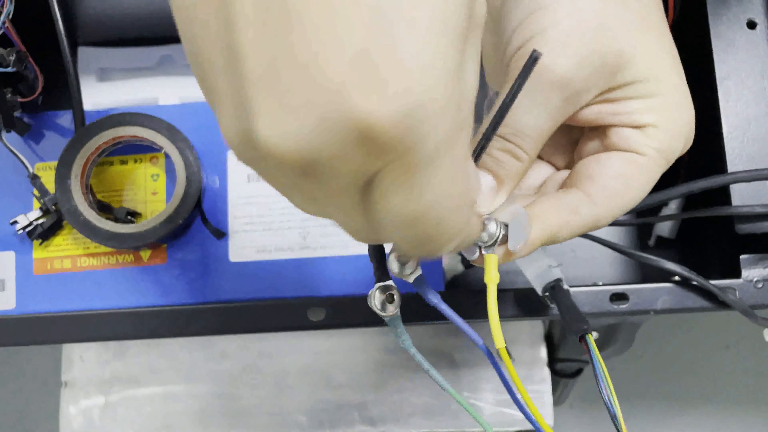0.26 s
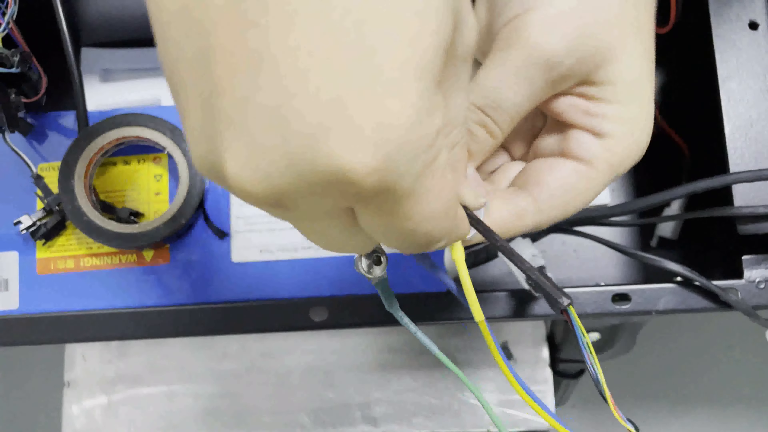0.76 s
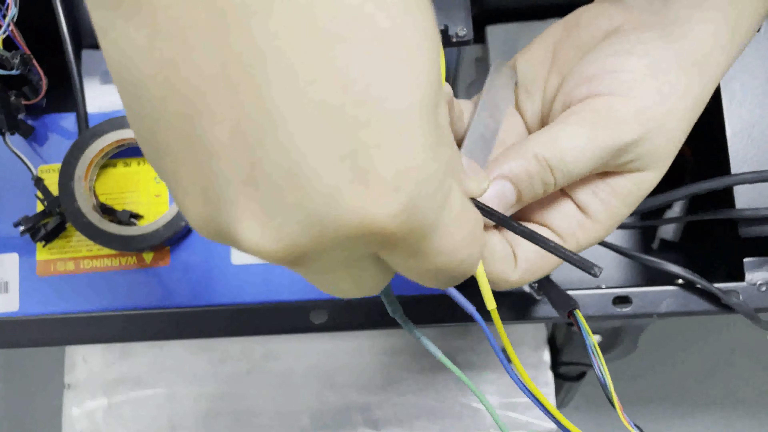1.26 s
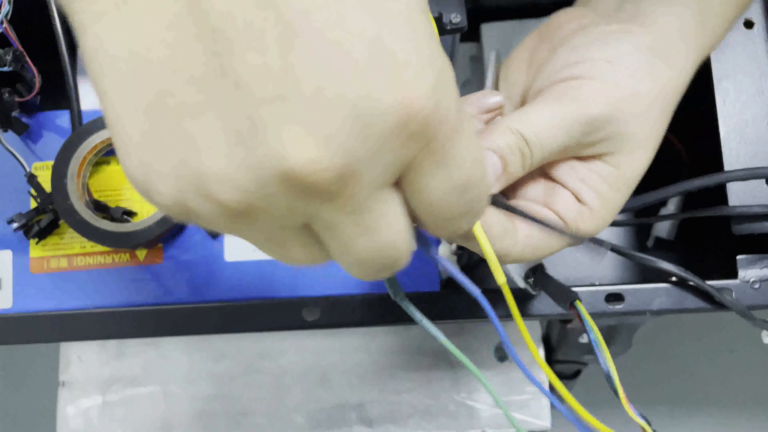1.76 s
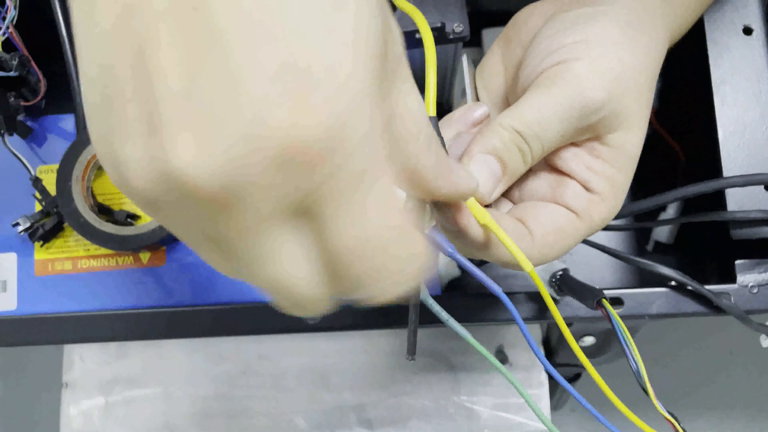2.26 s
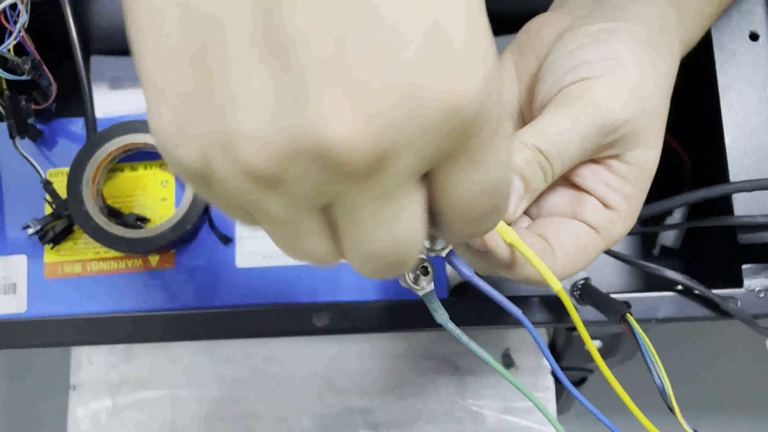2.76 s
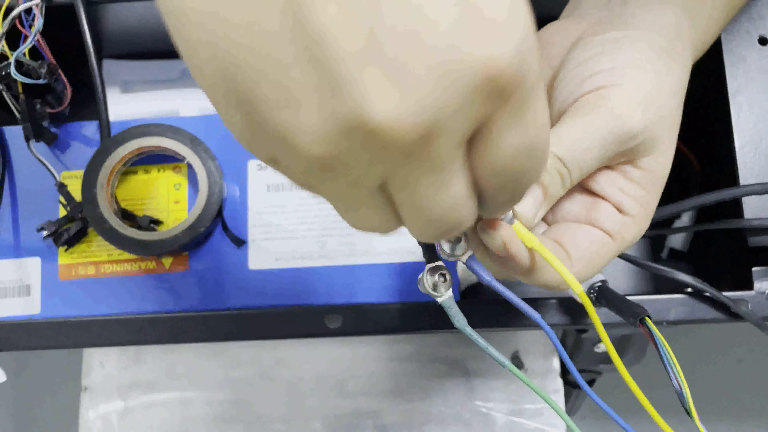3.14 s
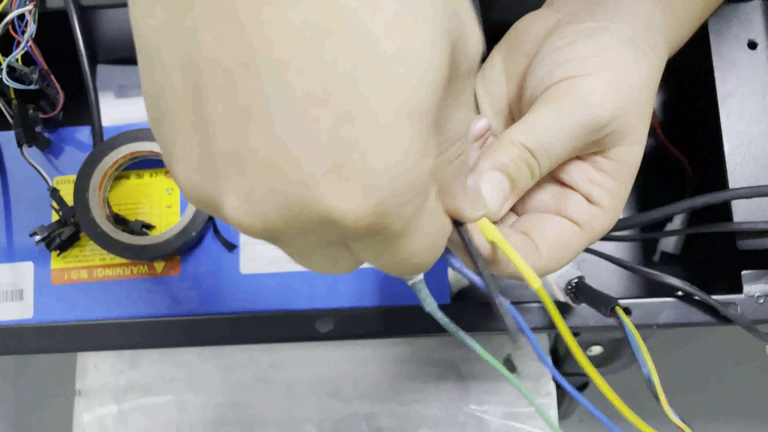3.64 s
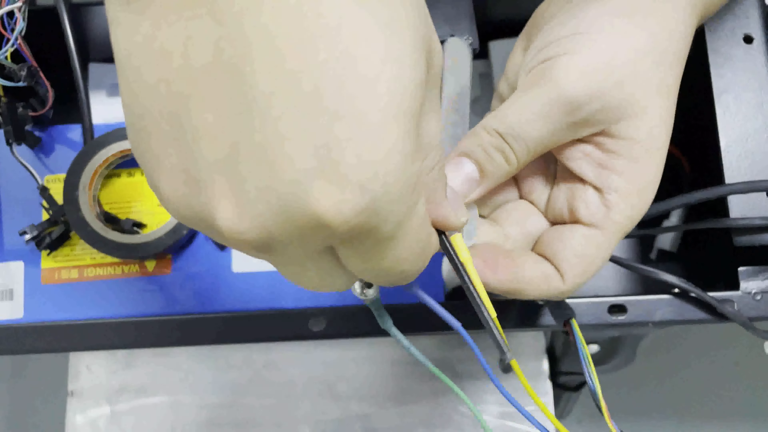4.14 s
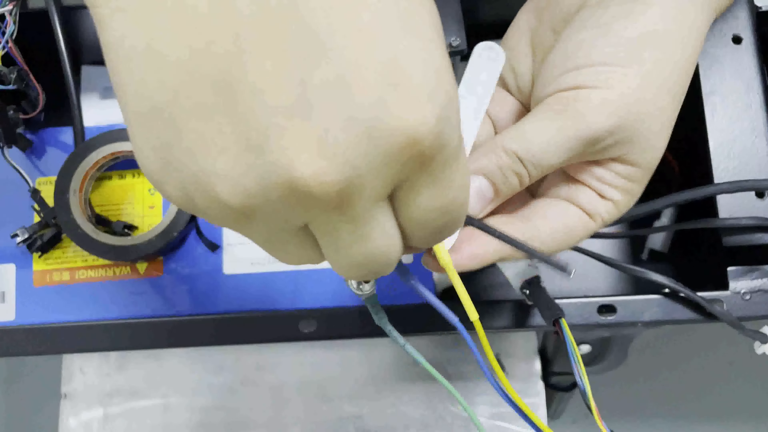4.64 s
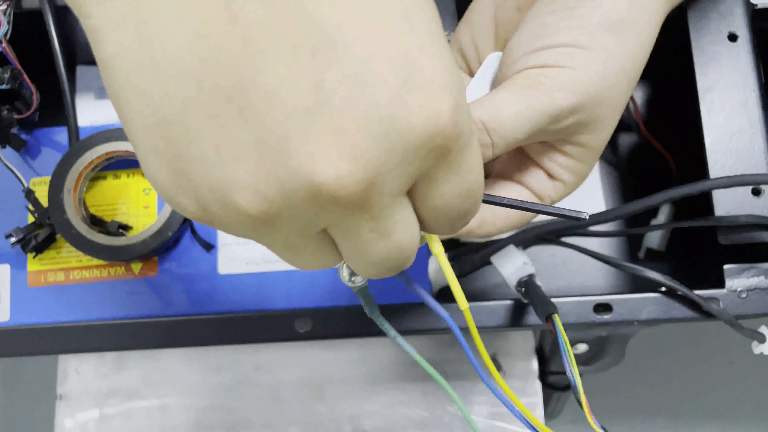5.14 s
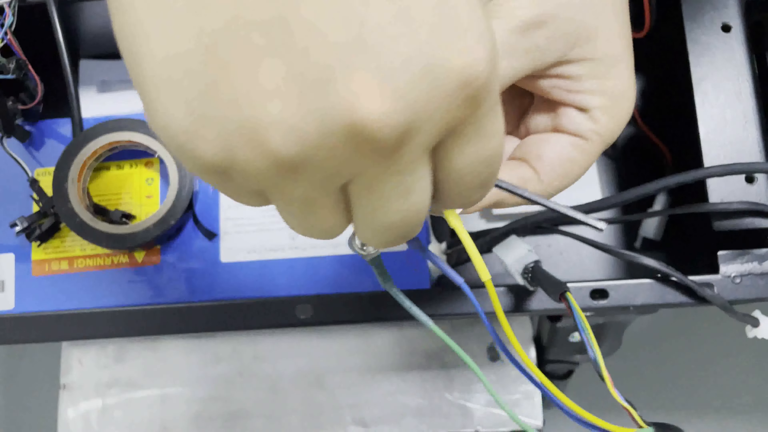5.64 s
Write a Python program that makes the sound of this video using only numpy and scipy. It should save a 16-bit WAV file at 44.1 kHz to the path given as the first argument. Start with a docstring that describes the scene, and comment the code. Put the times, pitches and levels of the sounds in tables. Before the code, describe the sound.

Close handling of wire terminals: soft thumps, skin rubbing insulation, plastic snaps and faint bright metallic ticks above a steady low hum.

```python
"""Assembling ring terminals on a battery pack

Hands fit ring terminals and wire connectors together close to two microphones; fans drone and throb behind.
Metal rings clink and scrape as sums of dying modes; connectors and cables knock the modes of the case.
Fingers rub and squeak on insulation by tiny slips or a wavering tone; plastic snaps and a latch springs home.
Close sounds get a diffuse echo, and metal and plastic also one early reflection."""
import sys
import numpy as np
from scipy import signal
from scipy.fft import rfft, irfft
from scipy.io import wavfile

SR = 44100
rng = np.random.default_rng(int(sys.argv[2]) if len(sys.argv) > 2 else 0)


def generate_wav(sig):
    """Save sig (samples, or channels by samples) to the path in sys.argv[1] as 16-bit PCM at SR."""
    pcm = np.round(np.clip(np.atleast_2d(sig).T, -1, 1) * 32767).astype(np.int16)
    wavfile.write(sys.argv[1], SR, pcm)


N = 260190  # length of the scene in samples
BINS = np.fft.rfftfreq(N, 1 / SR)  # frequencies of the whole scene's spectrum (Hz)


def amp(db):
    """Turns decibels into gain."""
    return 10 ** (np.asarray(db) / 20)


def unit(x):
    """Scales a sound to rms 1."""
    return x / np.sqrt(np.mean(x ** 2) + 1e-24)


def read(points, hz):
    """Reads between the points of a table on a log-frequency axis."""
    f, value = np.transpose(points)
    return np.interp(np.log(hz + 1), np.log(f + 1), value)


def add(mix, s, sound):
    """Mixes a sound in at time s, cutting off what falls outside the scene."""
    start = round(s * SR)
    sound = sound[max(-start, 0):]
    part = mix[max(start, 0):][:len(sound)]
    part += sound[:len(part)]


def drift(rate):
    """Random wander of rms 1, with little movement faster than the rate (Hz)."""
    spectrum = rfft(rng.standard_normal(N))
    lowpass = np.exp(-(BINS / rate) ** 2) * (BINS > 0)
    return unit(irfft(spectrum * lowpass, N))


def ring(modes, t, detune, swell_cycles=1e-6):
    """Modes that swell and die, each slightly detuned at random every time."""
    hz, db, t60 = np.transpose(modes)[:, :, None]
    hz = hz * (1 + detune * rng.standard_normal(hz.shape))
    swell = 1 - np.exp(-hz * t / swell_cycles)
    return (amp(db - 60 * t / t60) * swell * np.sin(2 * np.pi * hz * t)).sum(0)


def weigh(sound, centres_hz, levels_db):
    """Splits a sound into frequency groups and sets each one's level, as an rms over a hundredth of a second."""
    padded = 2 * len(sound)
    hz = np.fft.rfftfreq(padded, 1 / SR)
    # each group peaks at its own centre and fades out towards its neighbours
    shares = [read(list(zip(centres_hz, row)), hz) ** 5 for row in np.eye(len(centres_hz))]
    groups = irfft(rfft(sound, padded) * shares / np.sum(shares, 0))[:, :len(sound)]
    groups /= np.linalg.norm(groups, axis=1, keepdims=True)
    return amp(levels_db) @ groups * np.sqrt(SR / 100)


def slips(length, per_s, spread_db):
    """Tiny stick-slip jerks at random moments, of uneven size and either sign."""
    size = amp(spread_db * np.minimum(rng.exponential(1, length), 4))
    return size * rng.choice([-1, 1], length) * (rng.random(length) < per_s / SR)


# Steady tones of the fans, before the swell: (frequency [Hz], level [dB])
FAN_TONES = [(37.5, -52), (48.9, -44.5), (55.6, -31.5), (61.9, -36), (74, -46.5), (80, -46.5),
             (82.2, -43.5), (267, -59), (297.6, -72.5), (342, -61)]
# Slow swell of the fan tones: (time [s], level [dB])
FAN_SWELL = [(0, 2), (.7, 3), (1.3, -0.5), (1.8, 2.5), (2.3, 2.5), (2.8, 4), (3.3, 0.5), (4.2, 1),
             (5.9, 0.5)]
# Rumble and hiss of moving air, before its own wavering: (frequency [Hz], level [dB per Hz])
AIR_SPECTRUM = [(20, -89), (40, -62.5), (50, -73.5), (72, -47.5), (85, -54.5), (110, -58), (170, -69),
                (270, -66), (400, -75.5), (560, -77), (1300, -85), (2000, -91.5), (6000, -103.5),
                (8500, -119), (12000, -121), (15000, -135)]
# How alike the air sounds left and right: (frequency [Hz], coherence [-1 to 1])
AIR_LIKENESS = [(90, 0.95), (180, 0.82), (400, 0.56), (800, -0.28), (2000, 0.25), (5000, 0.45),
                (9000, -0.48)]


def ventilation(slip_turns=0.12, swell_db=0.7, left_db=1.87):
    """Fans at nearby speeds beat against each other over the rumble and hiss of moving air."""
    t = np.arange(N) / SR
    hum = np.zeros(N)
    for hz, db in FAN_TONES:
        turns = hz * t + rng.random() + slip_turns * drift(3.9)  # the speed wanders a little
        hum += amp(db) * np.sqrt(2) * np.sin(2 * np.pi * turns)
    hum *= amp(np.interp(t, *np.transpose(FAN_SWELL)))
    a, b = rfft(rng.standard_normal((2, N)))
    same = np.clip(read(AIR_LIKENESS, BINS), -1, 1)
    pair = np.array([a, same * a + np.sqrt(1 - same ** 2) * b])
    air = irfft(pair * amp(read(AIR_SPECTRUM, BINS)), N) * np.sqrt(SR / 2)
    air *= amp(swell_db * drift(20.0))
    return (hum + air) * amp([[left_db / 2], [-left_db / 2]])


# Fingers sliding on insulation; the level is before pressure and stutter:
# (start [s], end [s], level [dB], treble lift [dB], chafing pitch [Hz])
RUB_STROKES = [(-.04, 0.134, -41.5, 5.5, 785), (.064, 0.094, -44, -7.5, 800), (0.305, 0.474, -47, 6.5, 430),
               (0.314, .4, -46.5, -6, 2190), (0.419, 0.727, -54, 2.5, 776), (.515, 0.56, -50.5, -4.5, 700),
               (0.928, 1.03, -52, -6.5, 550), (1.335, 1.402, -61, 9, 890), (2.27, 2.463, -51.5, -1, 555),
               (2.561, 2.733, -55.5, 6, 860), (3.245, 3.405, -53, -2, 520), (3.249, 3.337, -53, 6, 1900),
               (4.724, 4.763, -54.5, 15, 1960)]
# Basic colour of skin on insulation: (frequency [Hz], level [dB])
RUB_COLOUR = [(200, -31), (450, 6), (850, 3), (1400, -5.5), (2500, -10.5), (4000, -17), (6500, -24),
              (9000, -33.5), (12000, -30.5), (15000, -40.5)]


def rubs(treble_hz=2000, chafe_db=10, chafe_width=0.05, stutter_db=2.0, lean=0.62, release=0.59):
    """Skin dragging on insulation: dense soft slips under each stroke, chafing at a pitch set by the grip."""
    out = np.zeros(N)
    for start, end, db, treble_db, chafe_hz in RUB_STROKES:
        length = max(round((end - start) * SR), 64)
        hz = np.fft.rfftfreq(length, 1 / SR)
        lift = treble_db * hz ** 2 / (hz ** 2 + treble_hz ** 2)
        chafe = chafe_db / (1 + ((hz / chafe_hz - 1) / chafe_width) ** 2)
        colour = amp(read(RUB_COLOUR, hz) + lift + chafe)
        stroke = irfft(rfft(slips(length, per_s=4500, spread_db=2.6)) * colour, length)
        # presses early, fades slowly
        pressure = np.sin(np.pi * (np.arange(length) / length) ** lean) ** release
        add(out, start, amp(db) * unit(stroke) * pressure)
    return out * amp(stutter_db * drift(53))  # the finger catches and lets go


# A fingertip squeaking on a sleeve: (start [s], end [s])
SQUEAK_SPAN = (2.668, 2.748)
SQUEAK_DB, SQUEAK_HZ = -56, 1660  # peak level before the stutter, and middle pitch


def squeak(waver=0.02, stutter_db=3):
    """Skin sticks and slips evenly for a moment: a thin, unsteady tone."""
    start, end = SQUEAK_SPAN
    progress = np.clip((np.arange(N) / SR - start) / (end - start), 0, 1)
    pressure = 2 * np.sqrt(progress * (1 - progress))
    turns = np.cumsum(SQUEAK_HZ * (1 + waver * drift(150))) / SR
    return amp(SQUEAK_DB + stutter_db * drift(80)) * pressure * np.sin(2 * np.pi * turns)


# Plastic housings and fingernails snapping past each other:
# (time [s], level [dB], pitch [Hz], width [octaves], sent to the echo [dB against the snap])
SNAP_EVENTS = [(.197, -41, 4100, 0.22, -11), (.502, -43.5, 890, 0.9, -9), (2.448, -57.5, 4140, 0.19, -11),
               (2.602, -49.5, 1060, 0.3, -7), (2.667, -47.5, 1090, 1.2, -7), (2.941, -43.5, 810, 0.66, -13),
               (2.959, -47, 4100, 0.26, -12), (3.025, -52, 1800, 0.76, -10), (3.2765, -43, 1050, 1.1, -12),
               (3.279, -47, 645, 0.46, -12), (4.144, -52, 1600, 1.3, -12), (4.706, -48, 3360, 0.53, -12),
               (4.731, -49, 1900, 1.7, -12), (4.734, -57, 2420, 0.37, -8), (4.766, -63, 3100, .45, -10),
               (4.9447, -45.5, 4810, 0.2, -20), (5.739, -51, 1300, 0.34, -6)]
SNAP_MIN_OCTAVES = .2  # plastic is too lossy to ring more narrowly than this


def snaps(contact_s=0.0062, grit=0.21):
    """A sharp release and a rough burst ring one resonance of the plastic; returns direct sound and echo feed."""
    near, far, t = np.zeros(N), np.zeros(N), np.arange(2048) / SR
    for s, db, hz, octaves, echo_db in SNAP_EVENTS:
        order = 4 if octaves < .35 else 2  # the narrow snaps have steep edges
        half_width = max(octaves, SNAP_MIN_OCTAVES) / 2
        edges_hz = np.minimum(hz * 2 ** np.array([-half_width, half_width]), SR / 2 - 1)
        housing = signal.butter(order, edges_hz, "band", fs=SR)
        # narrow snaps are the cleanest
        force = grit * octaves * rng.standard_normal(len(t)) * np.exp(-t / contact_s)
        force[0] += 2  # the sharp release
        snap = weigh(signal.lfilter(*housing, force), [hz], [db])
        add(near, s, snap)
        add(far, s, amp(echo_db) * snap)
    return near, far


# A connector latch springing home: (time [s], level [dB], sent to the echo [dB against the click])
LATCH_EVENT = (3.2432, -35.5, -8)
# Modes of its housing: (frequency [Hz], level [dB], time to fall 60 dB [s])
HOUSING_MODES = [(600, -7, .035), (1090, -1, .022), (1330, -4, .025), (1830, 4, .02), (2280, -3, .02),
                 (2560, -4, .02), (2950, -4, .025), (4250, -8, .015), (4780, -7, .015), (5950, -8, .015)]


def latch(rise_s=0.00044, crack_db=1, crack_t60=0.029):
    """The latch cracks against its housing, whose modes die quickly; returns direct sound and echo feed."""
    s, db, echo_db = LATCH_EVENT
    out, t = np.zeros(N), np.arange(4096) / SR
    hz, mode_db, t60 = np.transpose(HOUSING_MODES)[:, :, None]
    phase_turns = rng.random(hz.shape)
    body = (amp(mode_db - 60 * t / t60) * np.sin(2 * np.pi * (hz * t + phase_turns))).sum(0)
    band = signal.butter(1, [900, 3200], "band", fs=SR)
    crack = unit(signal.lfilter(*band, rng.standard_normal(len(t))))
    crack *= amp(crack_db - 60 * t / crack_t60)
    click = (body + crack) * (1 - np.exp(-(t / rise_s) ** 2))
    add(out, s, weigh(click, [hz.mean()], [db]))
    return out, amp(echo_db) * out


# Connectors and cables knocking on the case; above the knee the spectrum falls, and a high knee cracks more.
# The level is before the fade-in: (time [s], level [dB], knee [Hz])
KNOCK_EVENTS = [(.072, -40, 724), (.197, -33, 860), (.506, -43, 560), (.652, -44, 650), (.789, -36.5, 740),
                (1.2, -51, 1100), (2.392, -43, 544), (2.446, -38.5, 806), (2.961, -37, 725),
                (2.989, -50, 904), (3.243, -38, 700), (3.762, -41, 833), (3.854, -37.5, 466),
                (3.901, -33.5, 815), (3.911, -36, 760), (3.92, -38, 800), (4.149, -42, 560),
                (4.163, -43.5, 500), (4.951, -43, 1000), (4.957, -38.5, 560), (5.741, -42, 620)]
# Centres of the frequency groups that share a knock: (frequency [Hz])
KNOCK_GROUPS_HZ = [550, 1280, 2300, 4400, 9500]
# Modes of the case: (frequency [Hz], level [dB], time to fall 60 dB [s])
CASE_MODES = [(524.4, -6, .2), (552.3, 5.5, 0.1), (591, -11, 0.022), (840, -12, 0.092), (1005, -1.5, 0.12),
              (1258, 4, 0.069), (1340, 4, 0.077), (1624, -5.5, .04), (1850, -10.5, 0.12), (2700, -11, .025)]
CONTACT_S, KNEE_HZ = 0.0051, 830  # contact time of every blow, and knee of an ordinary one
FADE_IN_S = 0.00065  # a very short fade-in opens each knock
SWELL_CYCLES = 2.5  # the panels take a few cycles to get going, so the low ones bloom last


def knocks(fall_db_per_octave=7.5, steepen_db=1.8, rattle_db=-20, crack_db=-10, crack_db_per_octave=8, rise_s=0.0016):
    """A push and a short rough contact shake the case; harder blows crack more and ring less."""
    out, t = np.zeros(N), np.arange(8192) / SR
    soft = signal.butter(1, [900, 4000], "band", fs=SR)
    contact = np.exp(-t / CONTACT_S) * (1 - np.exp(-t / rise_s))
    fade_in = 1 - np.exp(-(t / FADE_IN_S) ** 2)
    for s, db, knee_hz in KNOCK_EVENTS:
        rattle, crack = rng.standard_normal((2, len(t))) * contact
        force = amp(rattle_db) * rattle
        force[0] += 1  # the push
        case = ring(CASE_MODES, t, detune=0.0011, swell_cycles=SWELL_CYCLES)
        body = signal.fftconvolve(force, case)[:len(t)]
        hard_db = crack_db + crack_db_per_octave * np.log2(knee_hz / KNEE_HZ)
        blow = unit(body) + amp(hard_db) * unit(signal.lfilter(*soft, crack))
        # the fall grows steeper further above the knee
        octaves_above = np.maximum(np.log2(np.array(KNOCK_GROUPS_HZ) / knee_hz), 0)
        levels_db = db - (fall_db_per_octave + steepen_db * octaves_above) * octaves_above
        add(out, s, weigh(blow, KNOCK_GROUPS_HZ, levels_db) * fade_in)
    return out


# Modes of the first ring terminal, also used by the clinks:
# (frequency [Hz], level [dB], time to fall 60 dB when free [s])
RING_MODES = [(3050, -1, .06), (3420, -1, .04), (3650, 1, .09), (3860, -2, .03), (4050, -6, .04),
              (7010, 5, .24), (7750, -7, .04), (9300, -10, .1), (11290, 3, .25), (11420, 7, .38),
              (13090, -3, .07), (14000, -3, .06), (14550, 3, .09), (15300, -2, .06)]
# Metal sliding on metal; the level is that of the grinding force: (start [s], end [s], level [dB])
SCRAPE_STROKES = [(.59, 0.645, -70), (0.741, 0.792, -64.5), (0.813, .86, -65), (1.532, 1.596, -64),
                  (1.588, 1.624, -50), (2.67, 2.708, -67), (3.372, 3.41, -71), (5.085, 5.16, -68),
                  (5.353, 5.42, -63.5)]


def scrapes(held_t60=0.03, ring_db=-6, grit_db=-1):
    """Rings grinding on each other: gritty slips that stir the choked modes."""
    force, t = np.zeros(N), np.arange(4096) / SR
    for start, end, db in SCRAPE_STROKES:
        length = max(round((end - start) * SR), 64)
        grind = slips(length, per_s=2500, spread_db=4)
        add(force, start, amp(db) * unit(grind) * signal.windows.tukey(length, .5))
    held = ring(RING_MODES, t, detune=.002) * amp(-60 * t / held_t60)
    ringing = signal.fftconvolve(force, held / np.linalg.norm(held))[:N]
    grit = signal.lfilter(*signal.butter(2, 3000, "high", fs=SR), force)
    return amp(ring_db) * ringing + amp(grit_db) * grit


# Metal rings touching; the point of contact sets how hard each group of modes is struck:
# (time [s], first group level [dB], second [dB], third [dB], fourth [dB], free ringing [dB against the strike])
CLINK_EVENTS = [(.197, -61.5, -50, -59.5, -61, -44), (.879, -57.5, -52, -60, -43, -26),
                (1.302, -73.5, -74, -75, -76, -29), (1.452, -62, -63, -60, -56, -29),
                (1.574, -74.5, -68, -65, -73, -35), (1.604, -55.5, -61, -69, -60, -26.5),
                (1.61, -51.5, -48.5, -44.5, -59, -16), (2.294, -60.5, -67, -60, -50, -27),
                (2.57, -57, -61, -57, -60, -34), (2.685, -64.5, -62, -67, -65, -41.5),
                (3.2425, -51.5, -55, -66, -58, -38.5), (3.5595, -55, -58, -61, -61, -36),
                (3.957, -65, -58, -54, -37, -29), (3.9588, -44, -44, -38.5, -35, -14.5),
                (4.0395, -55, -52, -53.5, -59, -14), (4.132, -61, -53, -71, -60, -24),
                (4.159, -68, -64, -67, -71, -15), (4.345, -73, -70, -76.5, -72, -15),
                (4.705, -59, -55, -68, -60, -12.5), (4.765, -66.5, -66, -72, -73, -14),
                (4.9445, -56.5, -66, -77, -64, -31), (5.108, -63, -65, -75, -69, -6),
                (5.1711, -47, -37.5, -58, -46, -11), (5.1735, -53, -45, -56, -47, -23.5),
                (5.372, -63.5, -61, -71.5, -76, -8), (5.392, -58, -55, -63, -64, -24.5),
                (5.7622, -50.5, -57.5, -63.5, -65, -35)]
# Centres of the four groups of modes: (frequency [Hz])
CLINK_GROUPS_HZ = [3600, 7400, 11300, 14600]
# Modes of the second ring terminal: (frequency [Hz], level [dB], time to fall 60 dB when free [s])
SECOND_RING_MODES = [(3100, -6, .04), (3680, 0, .06), (3900, -1, .03), (4200, -5, .03), (7180, 6, .5),
                     (7900, 3, .04), (8350, -1, .04), (9600, -5, .1), (11280, 1, .3), (14500, -3, .14),
                     (15150, 1, .05)]
SECOND_RING_S = 5  # when the fingers move on to the second terminal


def clinks(loose_s=0.0033, held_t60=0.03, tick_db=-12, tick_t60=0.015, rise_s=0.00026,
           chatter_db=6.5, chatter_hz=130):
    """A tick and ringing modes are soon choked by the fingers; a thin rest sings on, chattering in level."""
    out, t = np.zeros(N), np.arange(20000) / SR
    attack = 1 - np.exp(-(t / rise_s) ** 2)
    choke = amp(-60 * np.maximum(t - loose_s, 0) / held_t60)
    for s, *levels_db, free_db in CLINK_EVENTS:
        levels_db = np.array(levels_db)
        modes = RING_MODES if s < SECOND_RING_S else SECOND_RING_MODES
        held = ring(modes, t, detune=.003) * choke
        # a tightly pinched ring gives little but a dry tick
        dry_db = -1.15 * free_db
        tick = amp(tick_db + dry_db - 60 * t / tick_t60) * rng.standard_normal(len(t))
        add(out, s, weigh((held + tick) * attack, CLINK_GROUPS_HZ, levels_db))
        # the group struck hardest is the one that the grip leaves most free
        sung_db = levels_db + free_db + (levels_db - levels_db.max())
        chatter = amp(chatter_db * drift(chatter_hz)[:len(t)])
        free = ring(modes, t, detune=.001) * chatter
        add(out, s, weigh(free * attack, CLINK_GROUPS_HZ, sung_db))
    return out


BOUNCE_S, BOUNCE_DB, BOUNCE_TOP_HZ = .0065, -6.5, 5100  # delay, level, and where the treble fades


def bounce(x):
    """One early reflection from a hard surface nearby, later and duller than the direct sound."""
    delay = np.exp(-2j * np.pi * BINS * BOUNCE_S)
    dulling = 1 / (1 + (BINS / BOUNCE_TOP_HZ) ** 4)
    return irfft(rfft(x) * delay * amp(BOUNCE_DB) * dulling, N)


# How far the left leads the right: (frequency [Hz], phase [radians])
PORT_PHASE = [(300, 0.55), (1000, 0.93), (2200, 1.15), (3600, 0.57), (5200, 1.98), (6500, -1.4),
              (7100, -2.2), (8200, -1.5), (9500, -5.5), (11300, -7), (12500, -8), (13600, -9),
              (14700, -8.5), (16000, -9)]


def ports(x, left_db=2.0):
    """Near sounds reach the two microphone ports out of step, louder on the left except in the high treble."""
    louder = amp(left_db / 2 / (1 + (BINS / 8000) ** 4))
    half = np.exp(.5j * read(PORT_PHASE, BINS)) * louder
    return irfft(rfft(x) * np.array([half, 1 / half]), N)


# How long the echo lasts: (frequency [Hz], time to fall 60 dB [s])
ROOM_T60 = [(200, 0.064), (1000, 0.22), (4000, 0.57), (8000, 0.24), (11500, .34), (15000, 0.089)]


def room(x, onset_s=0.0007):
    """Diffuse stereo echo: noise that dies at a different speed at each pitch, slowest around 4 kHz."""
    hz, t, z = signal.stft(rng.standard_normal((2, SR // 2)), SR, nperseg=256)
    decay = amp(-60 * t / read(ROOM_T60, hz)[:, None]) * (1 - np.exp(-t / onset_s))
    tail = signal.istft(z * decay, SR, nperseg=256)[1]
    return signal.fftconvolve(x[None], tail / np.linalg.norm(tail[0]), axes=1)[:, :N]


def scene(soft_room_db=-9.0, metal_room_db=-11.5):
    """Close handling, its echo, and the drone of the room."""
    drone = ventilation()
    soft = knocks() + rubs() + squeak()
    metal = scrapes() + clinks()
    plastic, plastic_echo = np.add(snaps(), latch())
    echo = room(amp(soft_room_db) * soft + amp(metal_room_db) * metal + plastic_echo)
    close = soft + metal + plastic + bounce(metal + plastic)
    return ports(close) + echo + drone


def record(dry):
    """A steep low-pass takes away what lies above about 16.4 kHz."""
    lowpass = signal.firwin(255, 16400, window=("kaiser", 9), fs=SR)
    return signal.oaconvolve(dry, lowpass[None], "same")


dry = scene()
out = record(dry)
generate_wav(out)
```